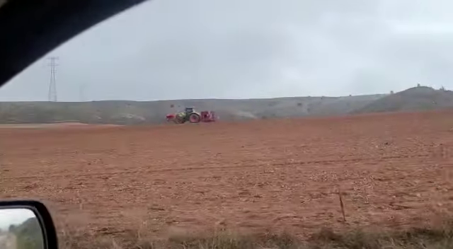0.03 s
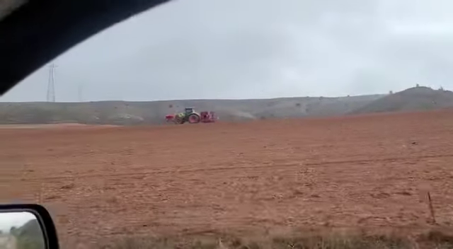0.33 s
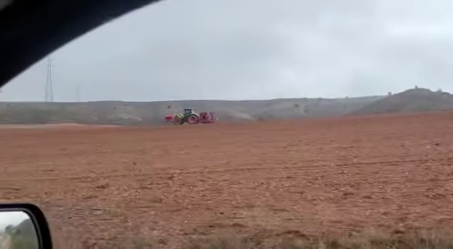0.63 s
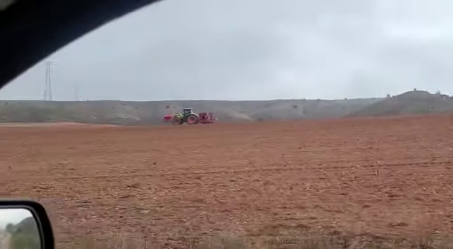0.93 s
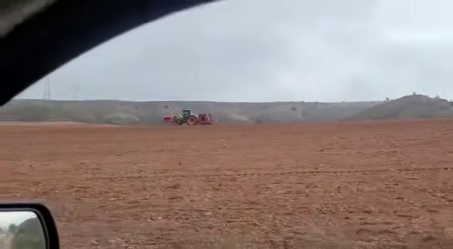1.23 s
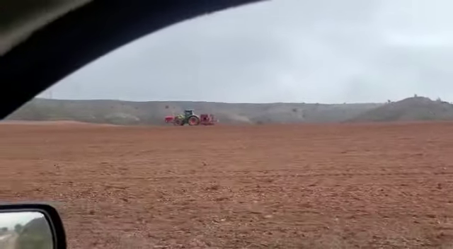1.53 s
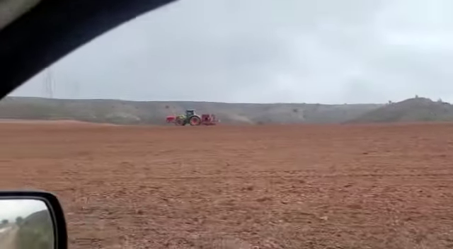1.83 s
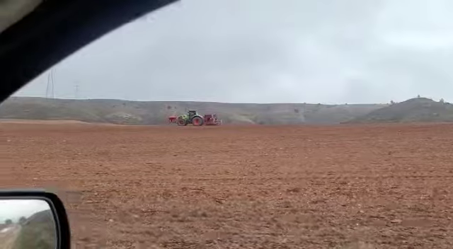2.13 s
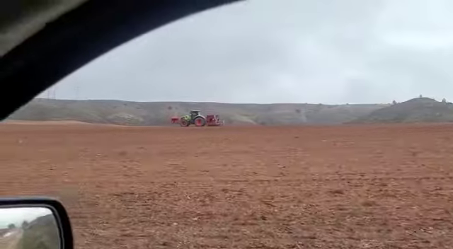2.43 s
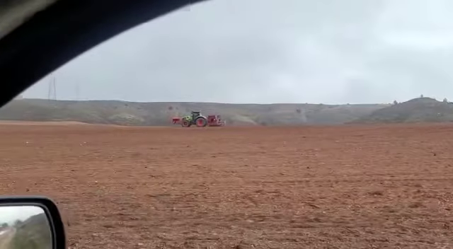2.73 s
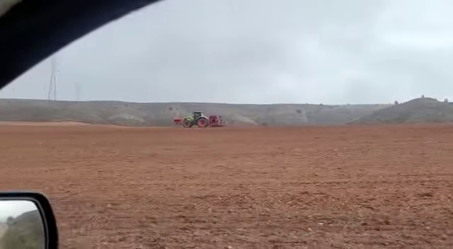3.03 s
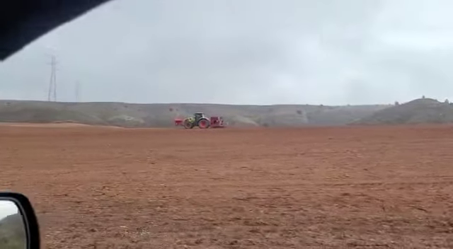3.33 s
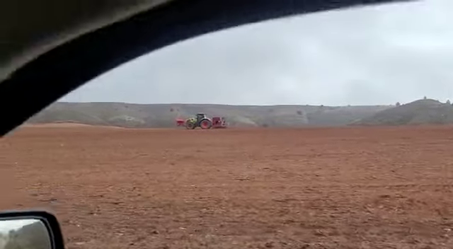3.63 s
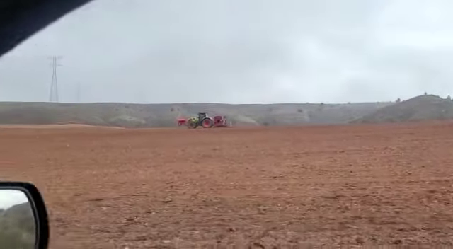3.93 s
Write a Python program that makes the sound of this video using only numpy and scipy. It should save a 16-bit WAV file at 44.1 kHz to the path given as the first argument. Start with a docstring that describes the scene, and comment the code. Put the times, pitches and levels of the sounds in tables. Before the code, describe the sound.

A car drives along, heard inside by an open window. From the start there is low road rumble, uneven cabin booming, tyre hum and faintly whistling air, with the engine droning under a thin high whine. At about 2.3 seconds the whine sags and breaks up while a low engine tone briefly swells. The pitch partly recovers, then falls again from 3.7 seconds as the air rush fades.

```python
"""Inside a car on a country road, side window open. From the start the road shakes the body and
makes the cabin boom, the tyres hum, and air rushes past the window, whistling faintly. The engine
drones under a thin whine, probably its alternator. At 2.3 s the driver eases off: the whine sags
and breaks up, and one engine harmonic swells. The whine's pitch partly recovers, then falls again
from 3.7 s as the air rush fades."""
import sys
import numpy as np
from scipy import signal
from scipy.fft import rfft, irfft
from scipy.io import wavfile
from scipy.ndimage import uniform_filter1d

SR = 44100
rng = np.random.default_rng(int(sys.argv[2]) if len(sys.argv) > 2 else 0)


def inscribe(sig):
    """Save sig as 16-bit PCM at rate SR to the path in sys.argv[1].

    A 1-D sig is mono; a 2-D sig holds one channel per row.
    Samples are clipped to [-1, 1] before scaling.
    """
    pcm = np.round(np.clip(np.atleast_2d(sig).T, -1, 1) * 32767)
    wavfile.write(sys.argv[1], SR, pcm.astype(np.int16))


N = 176400

GLIDE_START_S, GLIDE_END_S = 0.98, 2.66  # road rush and resonances glide from early to late levels
# draught at the window (time [s], relative level [dB])
DRAUGHT_DB = [(0, -41.5), (.41, -38.3), (.73, -41.5), (.85, -39), (1.45, -37), (1.55, -39), (1.8, -42),
              (2.16, -38), (2.44, -39.5), (2.6, -42), (2.78, -41), (3.45, -41.5), (3.55, -40), (3.8, -44),
              (4.0, -48.5)]
# ear balance (frequency [Hz], left minus right [dB])
BALANCE_DB = [(30, -1.5), (60, -2.5), (200, 0.5), (700, -1), (1300, -6), (2400, 1), (4400, 3), (8000, 1),
              (15000, 2.5)]


def cabin_boom():
    """The cabin's strongest resonance swells and drops with the road surface."""
    # resonance (time [s], pitch [Hz])
    pitch_hz = [(0, 177.5), (.7, 181.5), (1.2, 183.5), (1.6, 181.5), (2.1, 179.5), (2.4, 184), (2.7, 173),
                (3.3, 171.5), (4.0, 171.5)]
    # swells (time [s], relative level [dB])
    level_db = [(0, -37), (.04, -20), (.14, -28.5), (.42, -21.5), (.46, -22.5), (.53, -16), (.58, -29),
                (.65, -13), (.72, -38), (.77, -17.5), (.83, -14.5), (.9, -20.5), (.94, -22), (1.0, -29),
                (1.03, -12.5), (1.08, -22), (1.22, -15), (1.27, -24), (1.41, -15), (1.55, -13), (1.61, -23),
                (1.65, -14.5), (1.71, -23), (1.75, -18.5), (1.89, -17), (1.95, -27.5), (2.05, -18),
                (2.16, -16.5), (2.22, -30.5), (2.36, -18.5), (2.46, -44.5), (2.55, -20.5), (2.72, -42),
                (2.89, -32), (2.95, -17.5), (3.14, -30.5), (3.22, -18.5), (3.28, -30), (3.42, -25.5),
                (3.57, -24), (3.61, -37), (3.72, -17.5), (3.87, -41)]
    phase = turns(curve(pitch_hz) * (1 + 0.0071 * walk(11.3)))
    return np.sqrt(2) * undb(curve(level_db) - 1.25) * np.sin(phase)


def rumble():
    """Low body and cabin resonances, plus a lower band of tyre hum; the deepest part swells and fades."""
    # body, cabin and tyre bands (frequency [Hz], width [Hz], early level [dB], late level [dB])
    bands = [(31.3, 16, -36, -34), (46.3, 11.3, -32.5, -31), (70.8, 9.4, -33, -35.5),
             (135.9, 16.5, -32, -33.5), (161.7, 17, -30, -32), (276, 40, -41.5, -60),
             (318.5, 21.4, -41.5, -51.5), (407.5, 48, -45, -50), (677, 52, -42, -52.5),
             (870, 240, -61, -47.5)]
    # deepest rumble (time [s], gain [dB])
    swell_db = [(0, -1), (.35, -5), (.55, -1.5), (.85, 3.5), (1.05, -1), (1.5, 0.5), (2.25, 1.5),
                (2.7, -2.5), (3.25, 0.5), (4.0, 0)]
    deep_top_hz = 90
    ringing = resonances(bands, side_db=-17.5, flutter_db=0.1)
    deep = irfft(rfft(ringing) / (1 + (bins() / deep_top_hz) ** 10), N)
    return ringing + deep * (undb(curve(swell_db)) - 1)


def road_rush():
    """Low road noise that gradually softens by 2 dB."""
    # road spectrum (frequency [Hz], relative density [dB])
    spectrum_db = [(10, -40), (24, 1), (70, -8.5), (95, -14), (140, -2.5), (210, -0.5), (270, -10),
                   (400, -16), (540, -21.5), (760, -17.5), (1100, -18), (1300, -19.5), (1750, -18),
                   (2200, -23), (2700, -26.5), (4000, -37), (16000, -75)]
    level_db = curve([(GLIDE_START_S, -31.7), (GLIDE_END_S, -33.7)])
    return undb(level_db) * rush(spectrum_db)


def tyre_hum():
    """Fluttering tread hum that reaches each ear a little differently."""
    # tread tone (time [s], pitch [Hz])
    pitch_hz = [(0, 1007), (.8, 1003), (1.25, 1012), (1.6, 1004.5), (1.8, 994), (2.1, 1001), (3.0, 1001.5),
                (4.0, 1000.5)]
    # tread tone (time [s], relative level [dB])
    level_db = [(0, -35.5), (.06, -33), (.13, -39.5), (.24, -31.5), (.3, -43.5), (.38, -33.5), (.49, -45.5),
                (.59, -34.5), (.69, -48), (.75, -33), (.81, -47), (.9, -36.5), (.96, -47), (1.0, -33.5),
                (1.06, -41.5), (1.12, -38), (1.34, -35.5), (1.39, -43), (1.49, -36), (1.76, -44.5),
                (1.83, -39), (1.95, -50.5), (2.3, -42.5), (2.38, -54), (2.65, -45), (3.55, -48),
                (4.0, -42.5)]
    phase = turns(curve(pitch_hz) * (1 + 0.0019 * walk(23)))
    gain = np.sqrt(2) * undb(curve(level_db) - 0.5)
    return gain * np.array([undb(0.8 * walk(12)) * np.sin(phase + 0.45 * walk(8)) for _ in range(2)])


def engine():
    """Engine speed sets the pitch of both drone and whine."""
    # whine, geared to the engine (time [s], pitch [Hz])
    pitch_hz = [(0, 3776), (.62, 3774), (1.02, 3794), (1.6, 3772), (1.79, 3716), (2.0, 3756), (2.28, 3768),
                (2.5, 3510), (2.62, 3418), (2.75, 3390), (3.0, 3520), (3.25, 3550), (3.5, 3630),
                (3.7, 3645), (3.8, 3480), (3.9, 3200), (4.0, 3060)]
    whine_hz = uniform_filter1d(curve(pitch_hz), SR // 16, mode="nearest")
    return engine_drone(firing_hz=whine_hz / 60) + engine_whine(whine_hz)


def engine_drone(firing_hz):
    """Low multiples of the firing rate; the fourth swells off throttle."""
    # engine lines (multiple of firing rate, level [dB])
    harmonics = [(1, -41), (2, -46), (3, -39), (5, -52.5)]
    # fourth multiple (time [s], level [dB])
    overrun_db = [(0, -49), (2.3, -48), (2.45, -32.5), (2.7, -30), (2.86, -29), (2.96, -40), (3.3, -39),
                  (3.55, -58), (4.0, -39)]
    phase = turns(firing_hz * (1 + 0.0039 * walk(9.7)))
    drone = sum(undb(db + 2 * walk(1.3)) * np.sin(k * phase) for k, db in harmonics)
    overrun = undb(curve(overrun_db) + 1.3 * walk(5)) * np.sin(4 * phase)
    return np.sqrt(2) * (drone + overrun)


def engine_whine(hz):
    """Thin tone, probably the alternator; louder on the left, breaking up off throttle."""
    # whine (time [s], relative level [dB])
    level_db = [(0, -40.5), (.12, -36.5), (.3, -37), (.35, -41), (.62, -39), (.88, -35), (.96, -38.5),
                (1.45, -36), (1.55, -38.5), (1.7, -33.5), (1.82, -41), (1.97, -32.5), (2.27, -35),
                (2.46, -49), (2.56, -40), (2.75, -42.5), (2.86, -42.5), (2.97, -51), (3.35, -57),
                (3.66, -43.5), (3.74, -57), (3.8, -46.5), (4.0, -62)]
    # break-up (time [s], flicker depth [dB])
    breakup_db = [(2.25, 0), (2.45, 2.8)]
    pan_db, lead_rad = 7.5, 0.64
    phase = turns(hz * (1 + 0.0012 * walk(39)))
    left = undb(pan_db / 2 + 1.45 * walk(39)) * np.sin(phase + lead_rad)
    right = undb(-pan_db / 2 + 2.9 * walk(19)) * np.sin(phase)
    gain = undb(curve(level_db) + curve(breakup_db) * (walk(27) - .5))
    return np.sqrt(2) * gain * np.array([left, right])


def air_rush():
    """Air hisses past the open window."""
    # air spectrum (frequency [Hz], relative density [dB])
    spectrum_db = [(20, -25), (1200, -11), (2600, -6.5), (3500, 3), (4150, 0), (4700, -0.5), (5800, -1),
                   (6500, -5.5), (7500, -2.5), (8600, -7.5), (10300, -9.5), (11600, -9), (13500, -12),
                   (16000, -18)]
    return undb(curve(DRAUGHT_DB) - 0.83 + 0.35 * walk(9.6)) * rush(spectrum_db)


def whistles():
    """The air whistles faintly in narrow bands that rise and fall with the draught."""
    # bands (frequency [Hz], width [Hz], early and late relative level [dB])
    bands = [(1927, 91, -61, -53.5), (2455, 58, -60, -59), (3080, 34, -68, -57.5), (3700, 120, -53, -58),
             (4000, 30, -49.5, -63), (4370, 79, -51, -76), (4536, 48, -51.5, -56.5), (4740, 52, -59, -54.5),
             (4890, 55, -61, -55.5), (5410, 72, -58, -61.5), (6060, 56, -61, -55), (6820, 190, -55.5, -62),
             (7590, 160, -62, -58), (5100, 310, -60, -58)]
    draught_db = curve(DRAUGHT_DB)
    gain = undb(0.77 * (draught_db - draught_db.mean()))
    return gain * resonances(bands, side_db=-4.5, flutter_db=2.5)


def squeals():
    """Thin unsteady high tones swell and sink back; the lowest is probably an engine overtone."""
    # high tones (start [s], length [s], pitch [Hz], level at mid-swell [dB])
    tones = [(0.617, 0.36, 4640, -48), (1.12, .46, 4508, -48.5), (1.55, .9, 3500, -49),
             (2.7, .4, 4860, -54)]
    t, out = np.arange(N) / SR, 0
    for start_s, length_s, hz, db in tones:
        swell = np.sin(np.pi * np.clip((t - start_s) / length_s, 0, 1))
        phase = turns(hz * (1 + 0.00257 * walk(40.6)))
        flutter_db = 4.3 * np.array([walk(18), walk(18)])
        out = out + np.sqrt(2) * swell * undb(db + flutter_db) * np.sin(phase)
    return out


def cabin_echoes(x):
    """Dense short reflections off glass and trim ripple the treble, differently at each ear."""
    delay_s, decay_s, corner_hz = 0.002, 0.0064, 1500
    t = np.arange(N) / SR
    echoes = rng.standard_normal((2, N)) * np.exp(-t / decay_s) * (t > delay_s)
    echoes = undb(-3.5) * echoes / np.linalg.norm(echoes, axis=1, keepdims=True)
    treble = bins() / (bins() + corner_hz)
    return irfft(rfft(x) * (1 + treble * rfft(echoes)), N)


def resonances(rows, side_db, flutter_db):
    """Narrow resonances driven at random; each glides from its early to its late level."""
    f, out = bins(), 0
    for hz, width_hz, early_db, late_db in rows:
        ring = 1 / (1 + ((f / hz - hz / f) * hz / width_hz / np.sqrt(2)) ** 2)
        level_db = curve([(GLIDE_START_S, early_db), (GLIDE_END_S, late_db)])
        gain = undb(level_db + flutter_db * walk(2.7))
        out = out + gain * balance(hz) * ears(noise(ring), undb(side_db) * noise(ring))
    return out


def rush(spectrum_db, flicker_db=1.37, flicker_hz=19):
    """Stereo noise in flickering half-octave bands; ears mostly alike in the bass, unrelated on top."""
    # likeness of the ears (frequency [Hz], correlation [0-1])
    likeness = [(60, 0.86), (140, 0), (290, 0.86), (640, 0.75), (1400, 0.36), (3100, 0), (6000, 0),
                (15000, 0)]
    f = bins()
    alike = across(likeness, f)
    mid, side = rfft(rng.standard_normal((2, N)))
    spectra = ears(mid * np.sqrt(1 + alike), side * np.sqrt(1 - alike))
    spectra = spectra * undb(across(spectrum_db, f)) * balance(f)
    half_octaves = np.clip(2 * np.log2(f / 125), 0, 14)
    out = 0
    for k in range(15):
        band = irfft(spectra * np.maximum(1 - abs(half_octaves - k), 0), N)
        out = out + band * undb(flicker_db * walk(flicker_hz))
    return out / out.mean(axis=0).std()


def balance(hz):
    """Left and right gains per frequency."""
    return undb(np.outer([.5, -.5], across(BALANCE_DB, hz)))


def ears(mid, side):
    """Mid and side to left and right."""
    return np.array([mid + side, mid - side])


def undb(db):
    """Decibels to gain."""
    return 10 ** (np.asarray(db) / 20)


def curve(rows):
    """Join (time [s], value) rows by straight lines."""
    return np.interp(np.arange(N) / SR, *np.array(rows, float).T)


def across(rows, hz):
    """Read (frequency [Hz], value) rows on a log-frequency axis."""
    f, values = np.array(rows, float).T
    return np.interp(np.log(hz), np.log(f), values)


def bins():
    """FFT bin frequencies [Hz], floored at 1."""
    return np.maximum(np.arange(N // 2 + 1) * SR / N, 1)


def noise(gain):
    """Unit-rms noise with the given gain per bin."""
    count = np.flatnonzero(gain > gain.max() / 1000)[-1] + 1
    y = irfft(rng.standard_normal(2 * count).view(complex) * gain[:count], N)
    return y / y.std()


def walk(rate_hz):
    """Smooth random drift of unit spread, up to about rate_hz."""
    return noise(np.exp(-.5 * (bins() / rate_hz) ** 2))


def turns(hz):
    """Phase [rad] of a moving pitch, from a random start."""
    return 2 * np.pi * (np.cumsum(hz) / SR + rng.random())


def scene():
    """Everything as heard from the seat by the window."""
    rushing = road_rush() + air_rush()
    direct = whistles() + engine() + cabin_boom() + tyre_hum() + rumble() + squeals()
    return direct + cabin_echoes(rushing)


def record(dry):
    """Steep low-pass on the top treble."""
    top_hz = 15720
    return signal.sosfiltfilt(signal.ellip(10, .05, 60, top_hz, fs=SR, output="sos"), dry)


dry = scene()
out = record(dry)
inscribe(out)
```